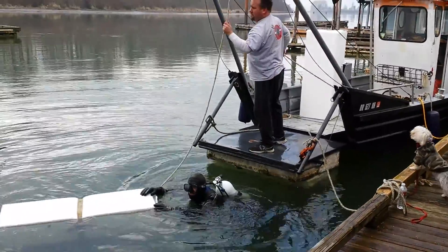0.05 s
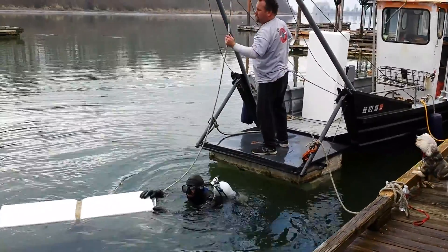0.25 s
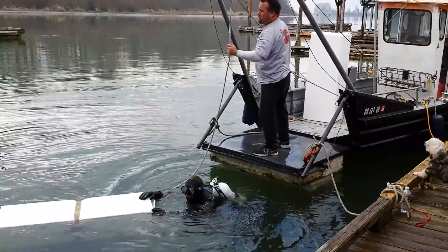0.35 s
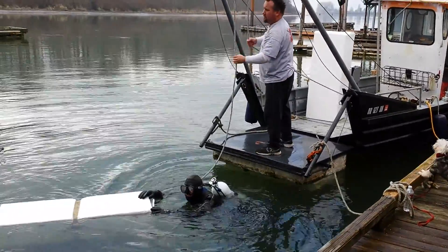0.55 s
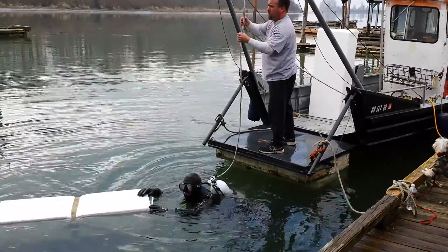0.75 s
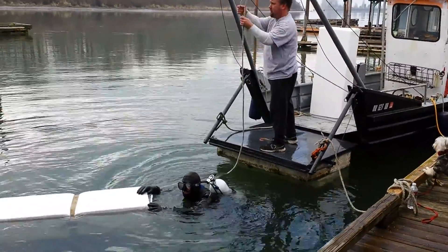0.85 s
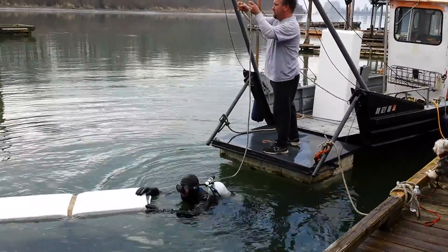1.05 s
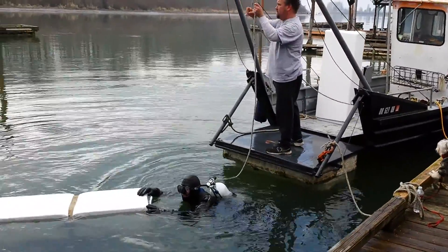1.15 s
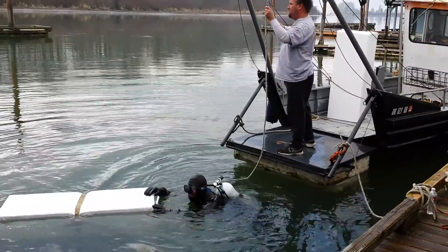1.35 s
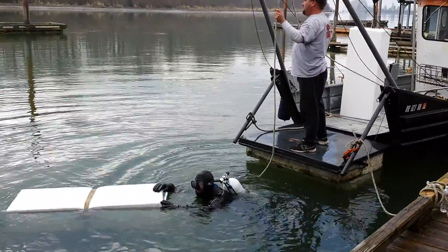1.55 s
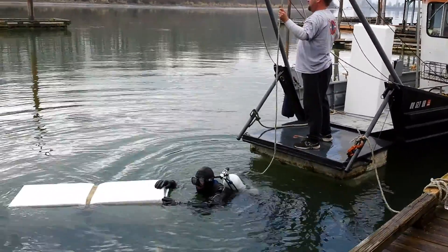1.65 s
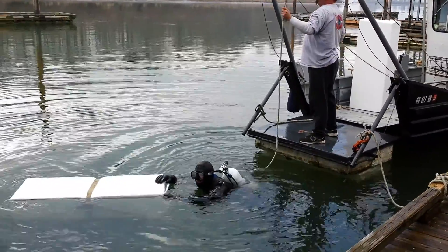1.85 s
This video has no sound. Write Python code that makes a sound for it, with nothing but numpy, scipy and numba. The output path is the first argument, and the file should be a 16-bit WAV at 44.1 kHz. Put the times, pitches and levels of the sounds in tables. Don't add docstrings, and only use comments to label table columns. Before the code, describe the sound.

A small dog barks hoarsely, close and slightly left, at 0.2 seconds, rising quickly then falling for under 0.2 seconds, with quick slap echoes across water. From 0.55 to 1.05 paws thud, fur and nails scuff planks, and collar tags clink. Sharp nail ticks lead into a higher, growled-in, breathy bark at 1.35-1.55, then more paw thuds. Water laps throughout, dipping mid-way, over a faint wavering motor hum.

```python
import sys
import numpy as np
from scipy import signal
from scipy.io import wavfile
from scipy.ndimage import uniform_filter1d, map_coordinates
from numba import njit

SR = 44100
rng = np.random.default_rng(int(sys.argv[2]) if len(sys.argv) > 2 else 0)


def generate_wav(signal):
    frames = np.transpose(np.atleast_2d(signal))
    scaled = np.clip(frames, -1, 1) * 32767
    pcm = np.round(scaled).astype(np.int16)
    wavfile.write(sys.argv[1], SR, pcm)


def makeup_ratio(level_db):
    decades = np.asarray(level_db, float) / 20
    return 10 ** decades


N = 83790

# (frequency [Hz], level [dB per Hz])
WATER_TONE = [(15, -45), (25, -19.5), (86, -8), (140, -6.5), (243, -9.5), (400, -23.5), (3000, -40.5),
              (5720, -25.5), (15000, -40)]
# (time [s], level [dB])
WATER_SWELL = [
    (0, 5),
    (.2, 2.5),
    (.7, -1.5),
    (1.1, -2.5),
    (1.3, 0),
    (1.6, 3),
    (1.9, 2),
]
# (time [s], level [dB])
SCUFF_LEVEL = [
    (.74, -48),
    (.755, -41.5),
    (.83, -35.5),
    (.97, -38),
    (1.06, -46.5),
    (1.2, -57.5),
    (1.65, -48.5),
    (1.72, -49),
    (1.9, -48),
]
# (frequency [Hz], level [dB per Hz])
SCUFF_TONE = [(180, 4), (300, -30.5), (391, -1.5), (814, -1), (2480, -15.5), (5170, -25), (8500, -19),
              (13000, -50), (22000, -120)]
# (time [s], peak level [dB])
PAW_STEPS = [(0.555, -35.5), (0.69, -40), (0.761, -37.5), (0.813, -25), (0.847, -33), (0.879, -32.5),
             (0.948, -32.5), (1.025, -33.5), (1.051, -36.5), (1.261, -45), (1.511, -30), (1.583, -29.5),
             (1.637, -39), (1.682, -27), (1.709, -33), (1.749, -33.5), (1.789, -30.5), (1.827, -40.5)]
# (frequency [Hz], level [dB], T60 [s])
PLANK_MODES = [(112, -2, .14), (160, -5, .12), (205, 0, .12), (300, -2, .1), (420, -6, .08), (560, -8, .07),
               (900, -11, .06)]
# (time [s], peak level [dB], centre [Hz])
NAIL_TICKS = [
    (0.052, -43.5, 11600),
    (.606, -42, 4870),
    (0.75, -32.5, 944),
    (0.788, -34.5, 1740),
    (1.204, -47, 6140),
    (1.326, -29, 6900),
    (1.347, -27, 9550),
    (1.817, -31, 9100),
]
# (time [s], peak level [dB], strongest ring [Hz])
TAG_CLINKS = [(0.1193, -38, 5300), (0.1567, -40, 5500), (0.7224, -43.5, 5000), (0.7625, -38, 4330),
              (0.7742, -29.5, 4900), (.781, -32, 2760), (0.7903, -33, 5060), (0.809, -33, 4224),
              (.826, -38, 4430), (0.84, -40, 4110), (.849, -36, 6100), (0.857, -35.5, 4360),
              (.858, -44, 8100), (0.9106, -37, 6240), (.922, -42, 5200), (0.9355, -34.5, 4500),
              (0.963, -35.5, 4860), (.964, -44, 8040), (.968, -32.5, 4170), (0.999, -44, 6050),
              (1.7758, -39, 5270), (1.8726, -38, 4500)]
# (frequency [Hz], level [dB], T60 [s])
TAG_MODES = [(2610, -13, 0.031), (3670, -5.5, 0.013), (4094, 1, 0.027), (4290, -7.5, 0.018),
             (4725, -7.5, 0.1), (5160, -0.5, 0.033), (5820, -6, 0.037), (6260, -7, 0.062),
             (6600, -16, 0.025), (7540, 3, 0.02), (8110, -3, 0.027), (8500, -3, 0.03)]
# (delay [s], level [dB])
ECHOES = [
    (0.043, -2.5),
    (0.101, -15),
    (0.169, -18.5),
    (0.222, -25),
    (0.292, -31),
    (0.358, -32),
    (0.45, -37.5),
]
# (time [s], effort [dB], pitch [Hz], mouth opening [factor on throat resonances])
BARK_COURSES = [
    [(.182, -31.5, 269.4, 0.86), (.192, -26, 289.5, 0.84), (.206, -10, 349.1, .9), (.238, -7, 450.8, 1.03),
     (.27, -10.5, 445.6, 0.98), (.3, -12.5, 385, 0.9), (.33, -14.5, 384.9, 0.84), (.35, -13.5, 435.9, 1.04),
     (.365, -9, 422, 0.95)],
    [(1.315, -52.5, 239.6, 0.79), (1.345, -32, 280.3, 0.79), (1.365, -21, 319.7, 1.02),
     (1.396, -12, 420.7, 0.988), (1.43, -13, 479.5, 1.045), (1.46, -13, 531.8, 1.02),
     (1.5, -18, 491.8, 0.92), (1.53, -23, 473.4, 0.86), (1.56, -20, 458, 0.89)],
]
# (frequency [Hz], width [Hz], level [dB]); the first row is the body
THROATS = [
    [(497, 49, -28.5), (750, 80, -8), (893, 96, 3), (1110, 100, -6.5), (1440, 170, -7.5), (1910, 410, -8.5),
     (2390, 350, -7), (3210, 450, -23.5), (4490, 240, -27), (5320, 170, -21), (7200, 1900, -19),
     (11660, 1900, -28)],
    [(596, 230, -18), (887, 120, -1.5), (1040, 127, 2), (1242, 158, -2), (1439.4, 250, -6.5),
     (1870, 196, -8), (2330, 530, -11), (3010, 320, -11), (3800, 1500, -14.5), (5300, 580, -22),
     (6610, 1030, -10.5), (8700, 2500, -16)],
]
# (time [s], boost of upper resonances [dB])
HARSHNESS = [
    [(.19, 5), (.22, 3), (.26, 1), (.3, -1), (.36, -5.5)],
    [(1.34, 6), (1.38, 6.5), (1.42, 3.5), (1.48, 2), (1.55, -6)],
]


def level(x, db):
    return x * makeup_ratio(db) / np.sqrt(np.mean(x ** 2))


def curve(rows, col):
    rows = np.array(rows, float)
    return np.interp(np.arange(N) / SR, rows[:, 0], rows[:, col])


@njit
def svf(x, hz, width):
    y, b, l = np.empty(len(x)), 0., 0.
    for i in range(len(x)):
        g, k = np.tan(np.pi * hz[i] / SR), width / hz[i]
        v = (b + g * (x[i] - l)) / (1 + g * (g + k))
        b, l, y[i] = 2 * v - b, l + 2 * g * v, k * v
    return y


def band(x, hz, width_hz):
    return svf(x, np.full(N, min(hz, .45 * SR)), 1. * width_hz)


def band_twice(x, hz, width_hz):
    return band(band(x, hz, width_hz), hz, width_hz)


def lowpass(x, hz):
    return signal.sosfilt(signal.butter(2, hz, fs=SR, output="sos"), x)


def highpass(x, hz, order):
    return signal.sosfilt(signal.butter(order, hz, "high", fs=SR, output="sos"), x)


def walk(rate):
    k = int(SR / rate)
    held = np.repeat(rng.standard_normal(N // k + 1), k)
    return 1.06 * uniform_filter1d(uniform_filter1d(held, k), k)[:N]


def colour(points, flicker_db, rate, alike_hz):
    out, p = 0, np.array(points, float)
    for hz in 28 * 2 ** np.arange(0, 9.1, .5):
        mid, side = (band_twice(rng.standard_normal(N), hz, hz / 2) for _ in range(2))
        db = np.interp(np.log(hz), np.log(p[:, 0]), p[:, 1], left=-60)
        db = db + flicker_db * min(1, 400 / hz + 0.39) * walk(rate)
        spread = min(hz / alike_hz + 18 / hz + 0.12, 1)
        out = out + makeup_ratio(db) * (mid + spread * side * np.array([[1], [-1]]))
    return level(out, 0)


def pan(x, db):
    return x * makeup_ratio(np.array([[db / 2], [-db / 2]]))


def strikes(events, modes, scatter_db, push_s, detune, focus_db=11):
    out, t = np.zeros(N + SR), np.arange(SR // 4) / SR
    mode_hz, mode_db, t60 = np.array(modes, float).T
    luck = rng.standard_normal((len(events), 2, len(mode_hz)))
    decays = np.exp(-np.log(1000) * t / t60[:, None])
    for (s, db, *best_hz), (db_luck, hz_luck) in zip(events, luck):
        off_db = -focus_db * np.abs(np.log2(mode_hz / best_hz[0])) if best_hz else 0
        gain = makeup_ratio(mode_db + off_db + scatter_db * db_luck)
        hz = mode_hz * (1 + detune * hz_luck)
        ring = gain @ (np.sin(2 * np.pi * hz[:, None] * t) * decays)
        ring = ring * (1 - np.exp(-t / push_s))
        out[int(s * SR):][:len(t)] += makeup_ratio(db) * ring / np.abs(ring).max()
    return out[:N]


def motor():
    hz = 81 * (1 + 0.011 * walk(3.14))
    return np.sin(2 * np.pi * np.cumsum(hz) / SR) * makeup_ratio(-49 + walk(29))


def water():
    ripple = np.array([level(band(rng.standard_normal(N), 5500, 700), -66.5) for _ in range(2)])
    lapping = colour(WATER_TONE, 1.6, 13.88, 2100) * makeup_ratio(-49)
    return (lapping + ripple * makeup_ratio(2.3 * walk(25))) * makeup_ratio(curve(WATER_SWELL, 1))


def scuffs():
    return colour(SCUFF_TONE, 7.0, 39.65, 1700) * makeup_ratio(curve(SCUFF_LEVEL, 1))


def paws():
    return strikes(PAW_STEPS, PLANK_MODES, scatter_db=3, push_s=0.018, detune=0.082)


def nails():
    t, out = np.arange(N) / SR, 0
    for s, db, hz in NAIL_TICKS:
        decay_s = 0.00034 * (6000 / hz) ** 2.7
        knock = 30 * (hz < 1200) * (np.abs(t - s) < .0001)
        burst = (rng.standard_normal(N) + knock) * np.exp(-np.abs(t - s) / decay_s) * (t >= s)
        crack = band_twice(burst, hz, hz * hz / 9000)
        out = out + makeup_ratio(db) * crack / np.abs(crack).max()
    return out


def collar_tags():
    return makeup_ratio(0.5) * strikes(TAG_CLINKS, TAG_MODES, scatter_db=2.5, push_s=0.00028, detune=.008)


def smear(start_s, decay_s):
    t = np.arange(SR) / SR
    decay = np.exp(-np.abs(t - start_s) / decay_s) * (t >= start_s)
    return rng.standard_normal((2, SR)) * decay / np.sqrt(decay_s * SR / 2)


def harbour(x):
    slaps = lowpass(sum(makeup_ratio(db) * smear(s, .016) for s, db in ECHOES), 4500)
    wash = makeup_ratio(-29) * lowpass(smear(0.019, 0.68 / np.log(1000)), 2600)
    dock = makeup_ratio(-9) * smear(0.001217, 0.0096)
    mid, side = slaps + wash + dock
    side = highpass(side, 1900, 1)
    return signal.fftconvolve(x[None], np.array([mid + side, mid - side]) * makeup_ratio(-1), axes=1)[:, :N]


@njit
def folds(hz, stretch, size):
    pulses, phase, p, k = np.zeros(len(hz) + 1), np.empty(len(hz)), 0., 0
    for i in range(len(hz)):
        step = hz[i] * stretch[k] / SR
        p += step
        if p >= 1:
            p, k = p - 1, k + 1
            pulses[i] += size[k] * p / step
            pulses[i + 1] += size[k] * (1 - p / step)
        phase[i] = p
    return pulses[:-1], phase


def fold_source(k, pitch):
    jitter, shimmer_db, breath = (.07, .11)[k], 3.5, (.5, .75)[k]
    luck = np.clip(rng.standard_normal((N // 40, 2)).T, -2, 2)
    pulses, phase = folds(pitch, np.exp(jitter * luck[0]), makeup_ratio(shimmer_db * luck[1]))
    puffs = np.exp(-phase / 6.3) * rng.standard_normal(N)
    return level(pulses - pulses.mean(), 0) + breath * level(puffs, 0)


def resonance(x, hz, width_hz):
    return level(svf(svf(x, hz, width_hz), hz, width_hz), 0)


def throat(k, source, mouth):
    harsh_db = curve(HARSHNESS[k], 1)
    air = source + 2.5 * rng.standard_normal(N)
    voice = 0
    for j, (hz, width_hz, db) in enumerate(THROATS[k][1:]):
        feed = source if hz < 4300 else air
        centre_hz = hz * mouth ** min(1, (1800 / hz) ** 2)
        gain = makeup_ratio(db + harsh_db * np.clip(np.log2(hz / 1300), 0, 1))
        voice = voice + (-1) ** j * gain * resonance(feed, centre_hz, 1.54 * width_hz)
    return level(highpass(voice, .8 * THROATS[k][1][0], 4), 0)


def chest_growl(k, source, pitch, start_s):
    db, late_s = (-29, -27)[k], (.001, .014)[k]
    growl = level(resonance(source, pitch, 170.0), db)
    growl = growl + level(resonance(source, pitch * 1.8, 260.0), db - 0.5)
    since = np.maximum(np.arange(N) / SR - start_s - late_s, 0)
    fade = makeup_ratio(-6000 * np.maximum(since - .03, 0) ** 1.46)
    return growl * np.minimum(since / 0.0022, 1) ** 2 * fade


def bark(k):
    rows, t = BARK_COURSES[k], np.arange(N) / SR
    start_s, end_s = rows[0][0], rows[-1][0]
    pitch, mouth = curve(rows, 2), curve(rows, 3)
    source = fold_source(k, pitch)
    body_hz, body_width_hz, body_db = THROATS[k][0]
    body = level(band(source, body_hz, body_width_hz), body_db)
    voice = (throat(k, source, mouth) + body) * makeup_ratio(curve(rows, 1))
    gate = (t > start_s) * np.clip((end_s - t) / 0.013, 0, 1)
    return (voice + chest_growl(k, source, pitch, start_s)) * gate


def scene():
    far = water() + motor()
    steps = paws()
    clinks = collar_tags() + nails()
    dog = bark(0) + bark(1)
    near = pan(dog, 2) * makeup_ratio(-6.5)
    lag = -0.000072 * SR
    near[1] = map_coordinates(near[1], [np.arange(N) + lag], mode="nearest")
    echoes = pan(harbour(dog + clinks + steps), 2.15) * makeup_ratio(-2.0)
    clink_spread = makeup_ratio(-3.5) * np.array([np.roll(clinks, 60), -np.roll(clinks, 95)])
    return near + echoes + pan(clinks, -3.5) + clink_spread + steps + scuffs() + far


def low_pass(x):
    return signal.sosfilt(signal.butter(12, 15000, fs=SR, output="sos"), x)


def record(dry):
    ceiling, top_hz, loud_db, window_s = 1.1, 11260, -36, .04
    x = np.tanh(dry / ceiling) * ceiling
    top = signal.sosfiltfilt(signal.butter(8, top_hz, "high", fs=SR, output="sos"), x)
    power = uniform_filter1d((x ** 2).mean(0), int(window_s * SR)) / makeup_ratio(2 * loud_db)
    mix = x - top * power ** 2 / (1 + power ** 2)
    return low_pass(mix)


dry = scene()
out = record(dry)
generate_wav(out)
```